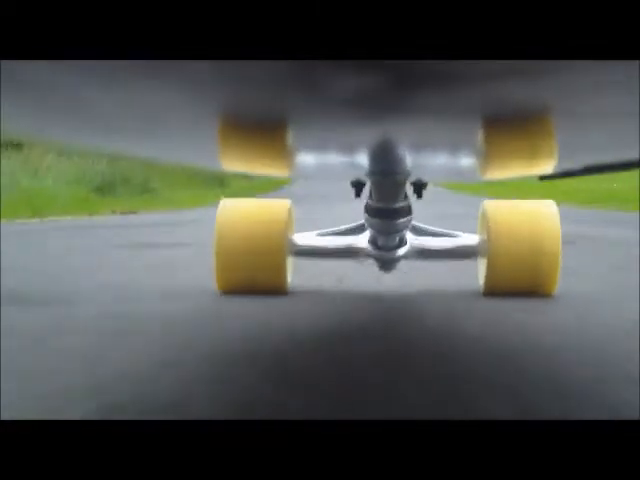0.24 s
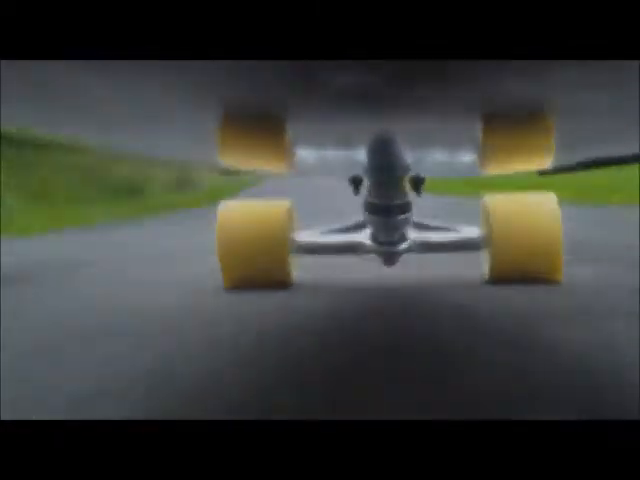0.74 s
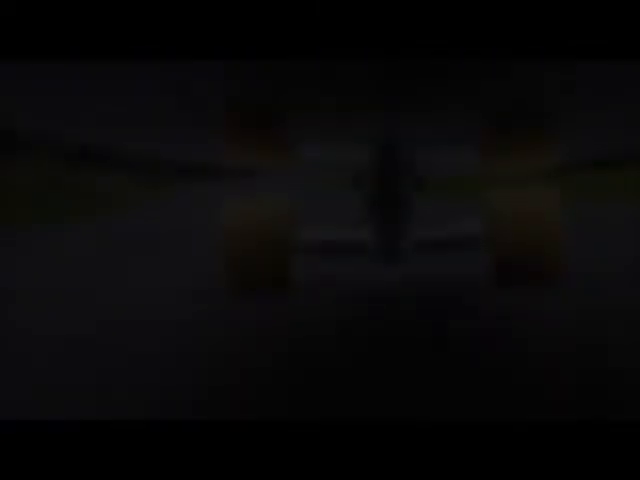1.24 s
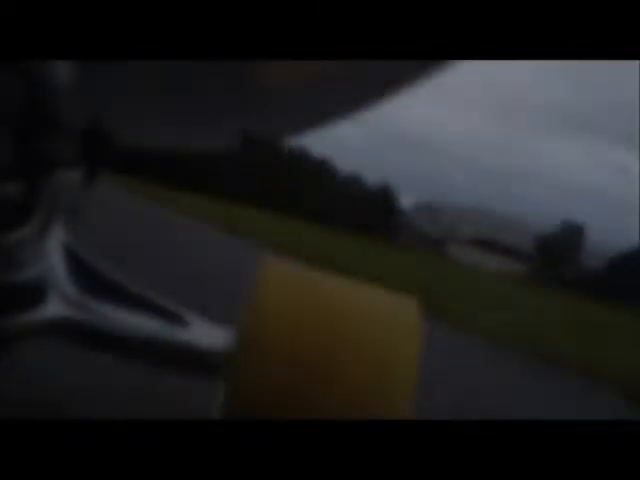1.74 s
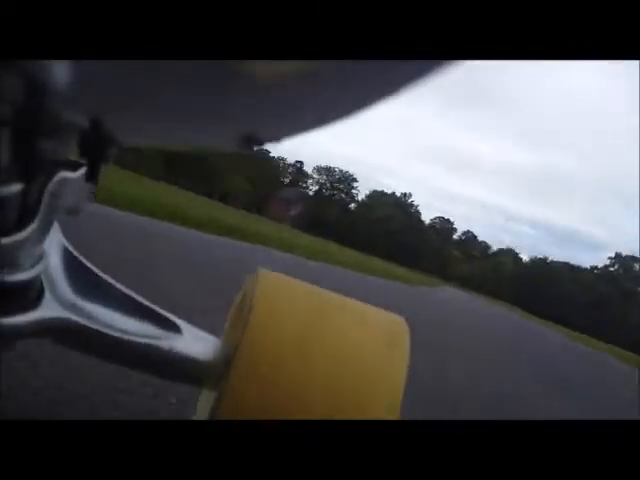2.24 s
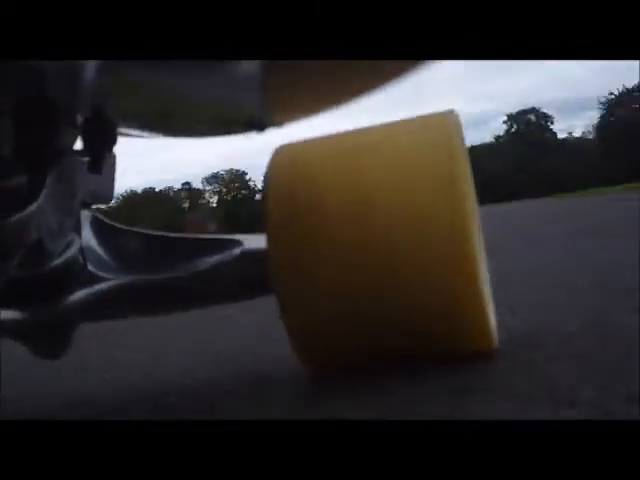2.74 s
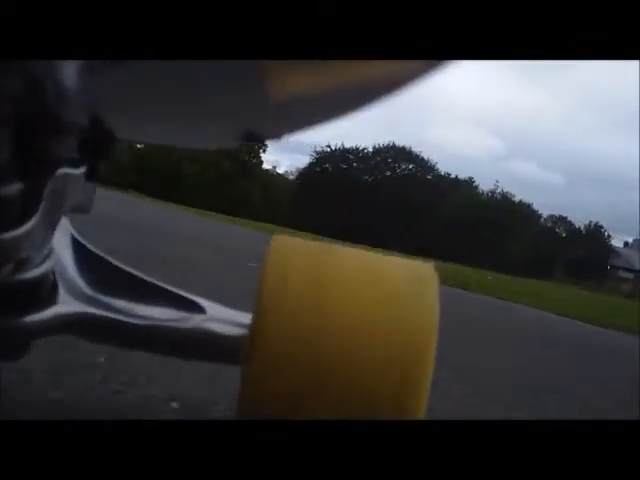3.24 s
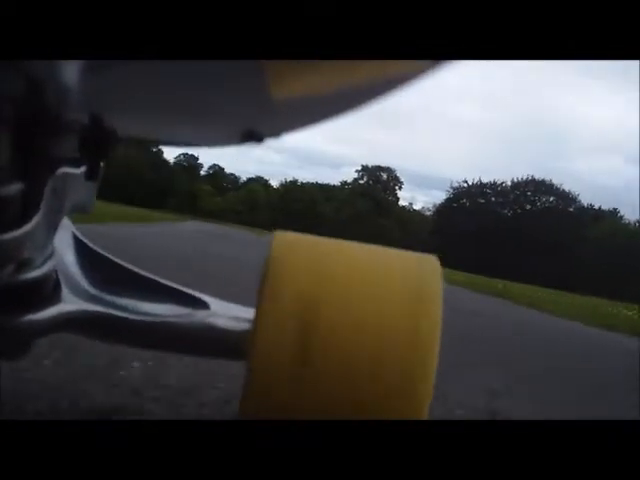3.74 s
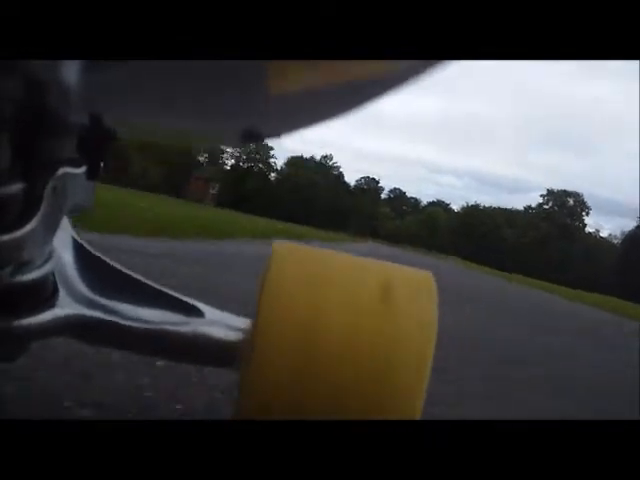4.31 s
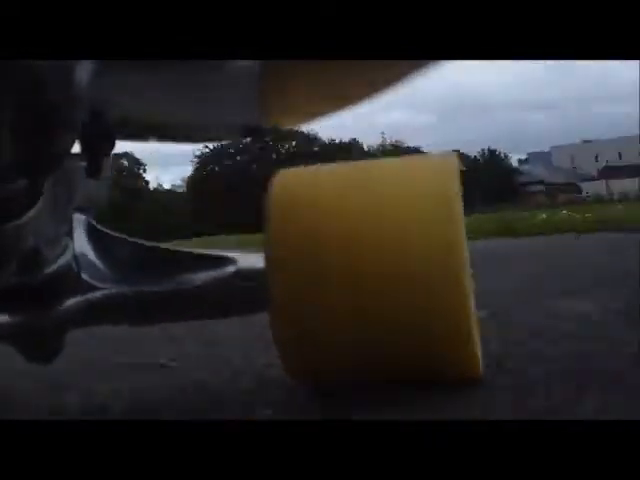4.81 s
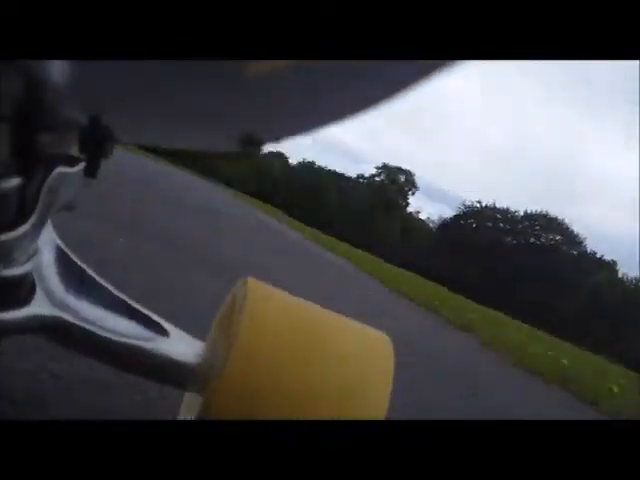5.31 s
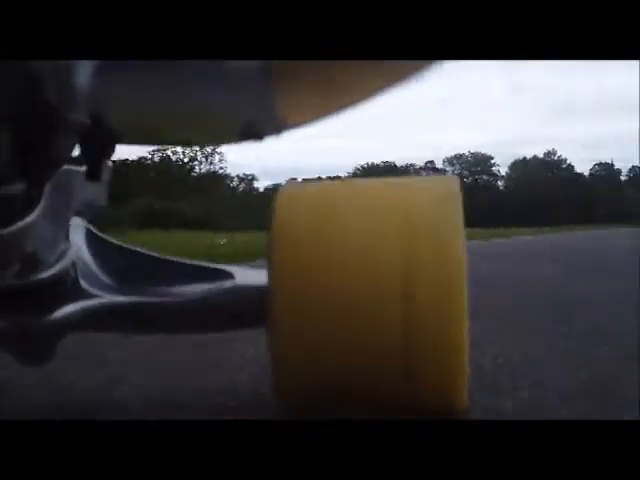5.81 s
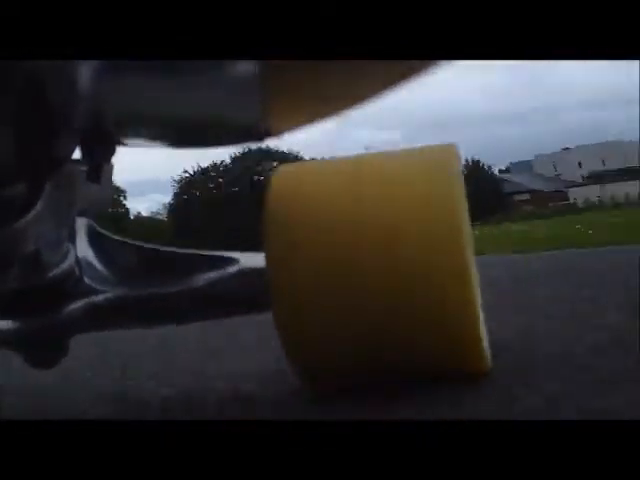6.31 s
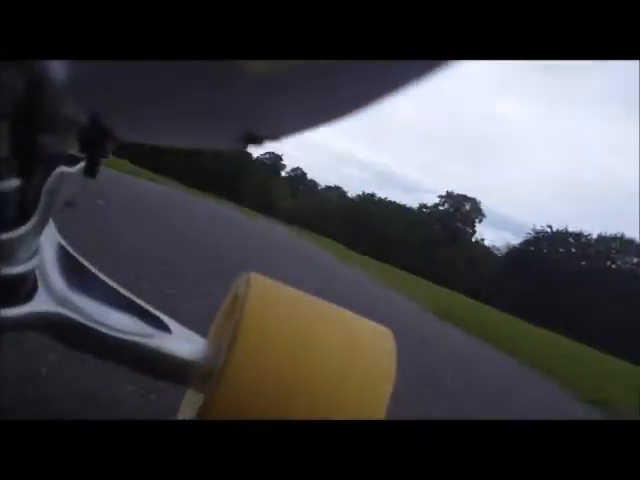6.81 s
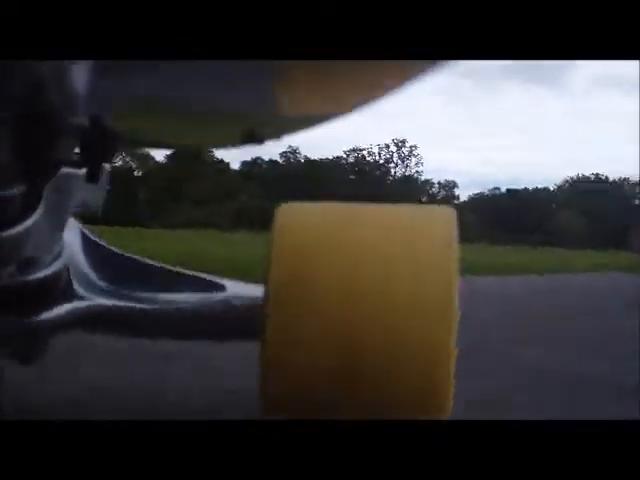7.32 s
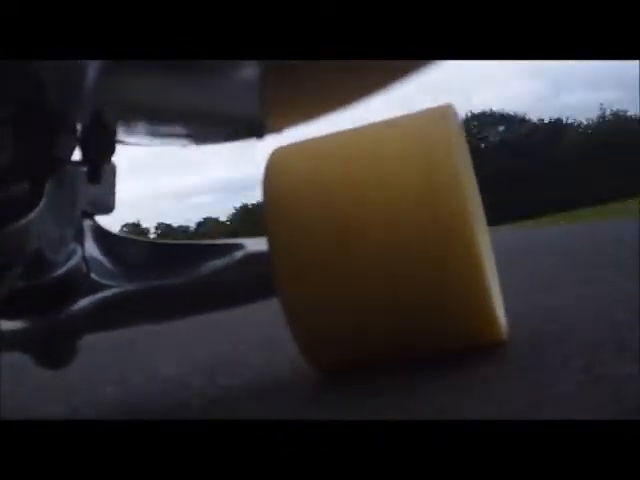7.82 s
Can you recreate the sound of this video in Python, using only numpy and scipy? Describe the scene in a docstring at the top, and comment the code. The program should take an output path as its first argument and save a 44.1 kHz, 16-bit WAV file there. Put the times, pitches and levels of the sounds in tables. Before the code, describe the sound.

Close under a longboard outdoors, soft wheels roar over asphalt while the deck drums and grit hisses. Bumps knock and stone chips tick on metal. Around two seconds the sound shifts abruptly to beside one wheel: quieter, with a faint rising whirr, swelling tread scrubs, brief rasping skids, and wind thumping the microphone until the end.

```python
"""The soft wheels of a longboard roar over asphalt: random contacts with the stones of the road ring their resonances.
One listens under the deck, first between the wheels, then beside one of them. The same road drums the deck.
The tread scrubs and rasps, at times harder in a carve or a slight turn; fine grit hisses and crunches, a bearing sings.
Bumps knock and ring the deck, a slipping wheel edge rasps, and flung chips tick against the metal truck.
Behind this, filtered noise makes the wind that thumps and hisses at the microphone."""
import sys
import numpy as np
from scipy import signal
from scipy.fft import rfft, irfft
from scipy.io import wavfile
from scipy.ndimage import uniform_filter1d

SR = 44100
rng = np.random.default_rng(int(sys.argv[2]) if len(sys.argv) > 2 else 0)


def generate_wav(sig):
    """Save sig (samples, or channels by samples) to the path in sys.argv[1] as 16-bit PCM at SR."""
    pcm = np.round(np.clip(np.atleast_2d(sig).T, -1, 1) * 32767).astype(np.int16)
    wavfile.write(sys.argv[1], SR, pcm)


N = 355446

# the deck bending along its length, and below that twisting:
# (f/Hz, width/Hz, relative level between the wheels/dB, relative level beside one/dB)
FLEX_MODES = [(112.3, 43, -9, -5.5), (139.2, 34, 1, 2), (163.6, 9.6, -3.5, 0.5)]
TWIST_MODES = [(188, 39.7, 2.5, -0.5), (246.4, 55, 4.5, 0), (291, 101, 1, -3.5)]
# listening position: (t/s, share between the wheels: 1 between, 0 beside one)
POSITION = [(2.16, 1), (2.2, 0)]
# the ride between the wheels, then beside one: (t/s, roar level before trim/dB, grit level before trim/dB)
RIDE_BETWEEN = [(0.0, -17, -34), (0.27, -14, -32), (0.42, -18.5, -34.5), (0.8, -15.5, -33.5),
                (1.32, -17, -31), (1.4, -19, -35), (1.65, -16.5, -33.5), (2.05, -14.5, -31),
                (2.17, -15.0, -29.5)]
RIDE_BESIDE = [(2.19, -20, -40), (2.27, -23.5, -43), (2.5, -25.5, -42.0), (2.76, -21.5, -38),
               (2.9, -24.5, -38.0), (3.05, -21.5, -36), (3.15, -21.5, -40.0), (3.6, -20, -41.0),
               (3.88, -23, -38.5), (4.05, -24.0, -43.5), (4.28, -26, -42.0), (4.38, -19, -37.5),
               (4.52, -24.5, -41.5), (4.97, -28.5, -44.5), (5.2, -20, -41.5), (5.52, -20.5, -40),
               (5.7, -26, -43.5), (6.0, -23, -38.0), (6.35, -23, -37), (6.55, -21, -40), (6.87, -18, -34.5),
               (7.11, -20.5, -40.5), (7.15, -28, -48), (7.45, -30.5, -43.5), (7.68, -22, -34.5),
               (7.85, -22, -36.5), (8.06, -25.5, -38.5)]


def from_db(db):
    """Turn decibels into a gain."""
    return 10 ** (np.asarray(db) / 20)


def rms_one(x):
    """Scale a sound to an average (rms) level of 1."""
    return x / np.sqrt(np.mean(x ** 2) + 1e-20)


def steady(x, seconds=0.11):
    """Hold the running level at 1, so that only the quick grain remains."""
    running_power = uniform_filter1d(x * x, int(seconds * SR))
    return x / np.sqrt(running_power + 1e-12)


def in_time(rows):
    """Draw straight lines between the rows: one value per sample for each column after the time."""
    times, *columns = np.transpose(rows)
    return [np.interp(np.arange(N) / SR, times, column) for column in columns]


def drift(rate_hz):
    """A random wander around 0 with spread 1, mostly slower than the given rate."""
    step = 40  # samples between computed points
    r = np.exp(-2 * np.pi * rate_hz * step / SR)
    warm_up = 2000  # points dropped while the filter settles
    noise = rng.standard_normal(N // step + 2 + warm_up)
    slow = signal.lfilter([1], [1, -2 * r, r * r], noise)[warm_up:]
    return np.interp(np.arange(N) / step, np.arange(len(slow)), rms_one(slow))


def cut(x, hz, kind, order=2):
    """Butterworth filter: "high" keeps what lies above the pitch hz, "low" what lies below."""
    return signal.sosfilt(signal.butter(order, hz, kind, fs=SR, output="sos"), x)


def response(spectrum, size=4096):
    """The click that has this spectrum, with its energy as early as possible (minimum phase); peak 1."""
    hz, db = np.transpose(spectrum)
    log_pitch = np.log(np.fft.rfftfreq(size, 1 / SR) + 1)
    gain = from_db(np.interp(log_pitch, np.log(hz), db))
    # folding the cepstrum onto its first half gives minimum phase
    cepstrum = irfft(np.log(gain))
    cepstrum[1:size // 2] *= 2
    cepstrum[size // 2 + 1:] = 0
    pulse = irfft(np.exp(rfft(cepstrum)))
    return pulse / np.abs(pulse).max()


def colour(x, spectrum):
    """Give every click in x this spectrum."""
    return signal.oaconvolve(x, response(spectrum))[:N]


def resonate(x, modes, between=0):
    """Side-by-side resonances with alternating signs; the listening position sets how loud each is."""
    out = 0
    for k, (hz, width, between_db, beside_db) in enumerate(modes):
        r = np.exp(-np.pi * width / SR)
        poles = [1, -2 * r * np.cos(2 * np.pi * hz / SR), r * r]
        ring = (1 - r * r) / 2 * signal.lfilter([1, 0, -1], poles, x + 1e-18)
        gain = between * from_db(between_db) + (1 - between) * from_db(beside_db)
        out = out + (-1) ** k * gain * ring
    return out


def contacts(per_s, spread_db):
    """Clicks at random moments with random sizes and signs, as from stones or grains; rms 1."""
    sizes = from_db(spread_db * np.minimum(rng.exponential(1, N), 4))
    signs = rng.choice([-1, 1], N)
    return rms_one(sizes * signs * (rng.random(N) < per_s / SR))


def strikes(events):
    """One click for each row (t/s, strength/dB)."""
    out = np.zeros(N)
    for s, db in events:
        out[int(np.clip(s * SR, 0, N - 1))] += from_db(db)
    return out


def bursts(events, decay_s):
    """An envelope that jumps at each event and dies away."""
    return signal.lfilter([1], [1, -np.exp(-1 / (decay_s * SR))], strikes(events) + 1e-18)


def swells(events):
    """One smooth arch for each row (middle t/s, length/s, level/dB, ..); one gain curve per level column."""
    t = np.arange(N) / SR
    total = 0
    for middle, length, *db in events:
        arch = np.cos(np.pi * np.clip((t - middle) / length, -.5, .5))
        total = total + np.outer(from_db(db), arch)
    return total


def follow(law):
    """The gain of a layer that follows the roar and the grit of the ride."""
    between_db, beside_db, per_roar, per_grit = law
    roar_db, grit_db = in_time(RIDE_BETWEEN + RIDE_BESIDE)
    between, = in_time(POSITION)
    swing_db = per_roar * (roar_db - roar_db.mean()) + per_grit * (grit_db - grit_db.mean())
    return from_db(between * between_db + (1 - between) * beside_db + swing_db)


def wheels(road, between):
    """Stones ring the wheels into a roar that thins with speed; beside a wheel a rising whirr joins in."""
    # resonances of the wheels and truck:
    # (f/Hz, width/Hz, relative level between the wheels/dB, relative level beside one/dB)
    wheel_modes = [(395, 50, -4, -3.5), (441, 62, 1, -1), (529.6, 135, -5, -3.5), (734, 130, -8.5, -3),
                   (828, 384, -15.5, -9.5)]
    thinning, thinning_hz = 0.86, 750  # share of the low end lost by the end, before levelling; its upper edge
    whirr_start_hz, whirr_climb_hz_per_s = 491.6, 20.6  # the whirr climbs as the board gathers speed
    t = np.arange(N) / SR
    roar = resonate(road * contacts(per_s=2500, spread_db=0.5), wheel_modes, between)
    roar = roar - thinning * (t / t[-1]) ** 2 * cut(roar, thinning_hz, "low", order=1)
    roar = steady(cut(cut(roar, 333, "high"), 770, "low", order=3))
    turn = 2 * np.pi * np.cumsum(whirr_start_hz + whirr_climb_hz_per_s * t) / SR
    # two random drifts blur the tone into a narrow band
    whirr = rms_one(road * (drift(45) * np.cos(turn) + drift(45) * np.sin(turn)))
    return steady(roar + from_db(-9.5) * (1 - between) * whirr, seconds=0.071)


def deck(road, between):
    """The stones drum the board, which flexes along its length and twists from wheel to wheel."""
    # how each layer follows the ride: (level between the wheels at average roar and grit/dB,
    # the same beside one/dB, change per roar [dB per dB], change per grit [dB per dB])
    flex_law = (-23.5, -22, 0.8, -0.13)
    twist_law = (-24, -19.5, 0.2, 0.69)
    # rippled asphalt shakes the deck harder: (middle t/s, length/s, flexing level/dB, twisting level/dB)
    ripples = [(0.08, .3, -17.5, -32), (0.78, 0.24, -15, -42), (0.93, 0.14, -33, -17),
               (1.04, 0.16, -11, -28), (1.28, 0.34, -14, -38), (1.89, .27, -15.5, -23),
               (2.8, .45, -26, -19), (3.27, 0.12, -20, -19), (3.44, 0.13, -16, -35),
               (3.72, 0.089, -16.5, -26), (3.89, 0.19, -23, -20), (4.42, .2, -17, -38),
               (6.2, .4, -23, -20.5)]
    flex = resonate(road * contacts(per_s=2000, spread_db=1.5), FLEX_MODES, between)
    flex = steady(cut(cut(flex, 66, "high"), 236, "low"), seconds=0.19)
    twist = resonate(road * contacts(per_s=1500, spread_db=2.5), TWIST_MODES, between)
    twist = steady(cut(cut(twist, 157, "high"), 415, "low", order=3))
    ripple_flex, ripple_twist = swells(ripples)
    # hypot adds the power of the steady ride and of the ripples
    flex_gain = np.hypot(follow(flex_law), ripple_flex)
    twist_gain = np.hypot(follow(twist_law), ripple_twist)
    return flex_gain * flex + twist_gain * twist


def scrub(road, between):
    """The tread slips in tiny jerks, with sharper, sparser rasping among them; both swell at times."""
    # resonances of the tread:
    # (f/Hz, width/Hz, relative level between the wheels/dB, relative level beside one/dB)
    tread_modes = [(841, 300, -2, 3.5), (1158, 281, 0, 3.5), (1366, 270, -2, -0.5), (1764, 250, -34, -16.5),
                   (2010, 370, -14.5, -21.5)]
    # spectrum of the rasping: (f/Hz, relative level/dB)
    rasp_spectrum = [(900, -38), (1400, 10.5), (1900, 10.5), (2400, 0), (2900, -3), (3600, -3.5),
                     (7000, -39)]
    # how each layer follows the ride: (level between the wheels at average roar and grit/dB,
    # the same beside one/dB, change per roar [dB per dB], change per grit [dB per dB])
    scrub_law = (-36, -30.5, 0.22, 1.07)
    rasp_law = (-47, -66.5, -2.5, 1.4)
    # harder scrubbing and rasping of the tread, in a carve or a slight turn:
    # (middle t/s, length/s, rasp level/dB, scrub level/dB)
    harder_scrubs = [(1.09, .3, -46, -27.5), (2.77, .18, -38, -32), (3.08, 0.53, -39.5, -45),
                     (3.3, 0.71, -77, -30), (4.8, 0.64, -45, -35), (5.36, 0.57, -37, -26.5),
                     (6.27, 0.75, -41, -43), (6.85, 0.11, -39, -24.5), (6.96, .14, -39, -26),
                     (7.7, 0.49, -41, -31.5)]
    slips = resonate(road * contacts(per_s=1800, spread_db=-1.5), tread_modes, between)
    soft = steady(cut(cut(slips, 790, "high"), 2620, "low"), seconds=0.077)
    sharp = steady(colour(road * contacts(per_s=500, spread_db=4.5), rasp_spectrum), seconds=0.07)
    harder_rasp, harder_scrub = swells(harder_scrubs)
    soft_gain = np.hypot(follow(scrub_law), harder_scrub)
    sharp_gain = np.hypot(follow(rasp_law), harder_rasp)
    return soft_gain * soft + sharp_gain * sharp


def grit(road):
    """Fine sand crackles under the wheels, over the hiss of air squeezed from the road's pores."""
    # spectrum of the grit: (f/Hz, relative level/dB)
    grit_spectrum = [(900, -26.5), (1600, 0), (2100, -2.5), (2750, -1.5), (3400, 0), (4000, -1.5),
                     (4500, -4.5), (5200, -6), (5800, -2), (6600, -2.5), (8000, -4), (9400, -6),
                     (12300, -19.5), (15300, -25)]
    crackle = road * contacts(per_s=5000, spread_db=3.0)
    fine = steady(colour(crackle + rng.standard_normal(N), grit_spectrum))
    # now and then a coarser grain pops: a burst of noise that dies away in 7.8 ms
    caught = np.abs(contacts(per_s=24, spread_db=1.5))
    pops = signal.lfilter([1], [1, -np.exp(-1 / (0.0078 * SR))], caught + 1e-18)
    coarse = rms_one(colour(pops * rng.standard_normal(N), grit_spectrum))
    return fine + from_db(-10) * coarse


def bearing():
    """The balls race: noise through one narrow, high resonance, with a random flutter in level."""
    race = resonate(rng.standard_normal(N), [(5770, 320, 0, 0)])
    race = rms_one(cut(race, 4500, "high"))
    return race * from_db(2 * drift(14))


def bumps():
    """A soft wheel drops over an edge: one rounded push, and the deck rings."""
    # bumps under a wheel: (t/s, strength before filtering/dB)
    bump_events = [(0.378, -7), (0.444, -7), (0.597, -3), (0.699, -10), (0.804, -8), (0.999, -5),
                   (1.124, -1), (1.305, -5.5), (2.003, -2), (2.145, -2), (2.22, -6), (2.609, -9),
                   (2.753, -4), (3.058, -6.5), (3.861, -7.5), (4.644, -7), (6.251, -8), (6.702, -9),
                   (6.872, -5), (7.031, -4), (7.174, -12), (7.504, -12.5), (7.619, -7), (7.68, -2),
                   (7.719, -1), (7.836, -8)]
    # spectrum of the push: (f/Hz, relative level/dB)
    push_spectrum = [(40, -69), (150, 10), (400, 10.0), (700, 8.0), (1300, -26.0), (2500, -62), (6000, -87)]
    hits = strikes(bump_events)
    push = colour(hits, push_spectrum)
    ring = cut(resonate(hits, FLEX_MODES + TWIST_MODES), 600, "low")
    return ring - from_db(1.0) * push


def skids():
    """The edge of a wheel lets go for an instant and rasps: dense random clicks in a short swell."""
    # short skids of the tread: (t/s, strength before smoothing/dB)
    skid_events = [(2.7536, -35), (3.1672, -21.5), (3.9948, -25), (4.5287, -23.5), (4.6454, -30),
                   (4.8145, -28), (4.915, -20.5), (5.1392, -17.5), (5.3044, -19.5), (5.3228, -20),
                   (5.3597, -16), (5.4144, -18), (5.5344, -18), (6.4834, -21), (6.6744, -24), (7.5622, -25)]
    # spectrum of a skid: (f/Hz, relative level/dB)
    skid_spectrum = [(300, -35), (700, 15), (1200, 12), (1800, 5), (2500, -9.5), (3500, -9.5),
                     (6000, -37.5)]
    rasp = steady(colour(contacts(per_s=1800, spread_db=4.5), skid_spectrum), seconds=0.009)
    swell = cut(bursts(skid_events, decay_s=0.016), 150, "low", order=1)  # the grip takes a moment to fail
    return from_db(-1.0) * rasp * swell


def crunches(grit_db):
    """A grain breaks with one crack amid a burst of smaller ones; small loose grains only crack."""
    # grit crushed under a wheel: (middle t/s, length/s, strength before trim/dB)
    crunch_events = [(0.304, .018, -33), (0.808, .02, -24), (0.932, .012, -26), (1.09, .014, -27),
                     (1.142, .02, -24), (1.316, 0.07, -26.5), (2.775, .01, -31), (2.822, .008, -33),
                     (2.942, .035, -30), (2.995, .01, -28.5), (3.06, .014, -29), (4.723, .008, -28),
                     (4.859, .012, -32.5), (5.886, .008, -26.5), (6.159, .016, -28), (6.27, .016, -30),
                     (6.389, .012, -28), (6.418, .012, -27), (6.558, .01, -27.5), (6.703, 0.015, -22.5),
                     (7.297, .008, -32.5), (7.835, .02, -25.5)]
    # spectrum of a crack: (f/Hz, relative level/dB)
    crunch_spectrum = [(500, -12), (1300, 21.5), (2100, 16.5), (3200, 20), (4500, 14.5), (7000, 15),
                       (10000, -40), (15000, -34)]
    crack_db = 10  # added to the table's strength for the main crack
    loose_per_s, loose_db = 14, 12  # small loose grains; their largest click above the grit curve, in dB
    loose = (rng.random(N) < loose_per_s / SR) * (2 * rng.random(N) - 1) * from_db(grit_db + loose_db)
    main_cracks = strikes([(s, db + crack_db) for s, _, db in crunch_events])
    cracks = colour(main_cracks + loose, crunch_spectrum)
    splinters = steady(colour(contacts(per_s=5000, spread_db=2.5), crunch_spectrum), seconds=.01)
    crushing, = swells(crunch_events)
    return cracks + from_db(-4) * splinters * crushing


def chips():
    """A chip flung against the metal truck gives a tiny bright tick and a very short rattle of noise."""
    # chips that hit the truck: (t/s, strength before trim/dB)
    chip_events = [(0.081, -20), (0.1371, -22), (0.6804, -22), (1.0083, -13.5), (1.309, -19), (1.331, -18),
                   (2.6467, -22), (2.6773, -15)]
    # spectrum of a tick: (f/Hz, relative level/dB)
    chip_spectrum = [(2500, -21), (5500, -1), (7500, 2), (10000, 1.5), (13000, -8), (16000, -7)]
    tick = colour(strikes(chip_events), chip_spectrum)
    rattle = rms_one(colour(rng.standard_normal(N), chip_spectrum)) * bursts(chip_events, decay_s=0.0014)
    return from_db(2) * tick + from_db(-4) * rattle


def wind(road):
    """Eddies thump on the microphone port and air hisses past it: low and high noise, harder in a gust."""
    # spectra of the thumping, then of the hiss: (f/Hz, relative level/dB)
    gust_spectrum = [(15, -58), (28, -2), (45, 10), (70, 14), (95, 19.5), (150, 11.5), (400, -58.5)]
    air_spectrum = [(3000, -14), (7000, -25), (10000, 8.5), (15500, 9)]
    # how each layer follows the ride: (level between the wheels at average roar and grit/dB,
    # the same beside one/dB, change per roar [dB per dB], change per grit [dB per dB])
    buffet_law = (-41, -31.5, .6, 0.6)
    air_law = (-56, -47.5, 0, 1.45)
    # gusts: (middle t/s, length/s, thumping level/dB, hiss level/dB)
    gusts = [(2.08, 0.53, -24.5, -43), (2.82, .32, -27, -57), (4.05, .6, -25, -75),
             (4.69, 0.32, -23.5, -58), (5.5, 1.5, -30, -60), (7.1, 0.36, -28, -59),
             (7.85, 0.34, -28.5, -39)]
    lumps = from_db(2 * drift(12))
    eddies = steady(colour(rng.standard_normal(N), gust_spectrum) * lumps)
    air = steady(colour(road * rng.standard_normal(N), air_spectrum))
    gust_buffet, gust_air = swells(gusts)
    buffet_gain = np.hypot(follow(buffet_law), gust_buffet)
    air_gain = np.hypot(follow(air_law), gust_air)
    return buffet_gain * eddies + air_gain * air


def scene():
    """Mix all layers; one shared unevenness of the road shapes those that roll on it and the air hiss."""
    # the rider's weight loads the bearing and it sings: (middle t/s, length/s, level before flutter/dB)
    loads = [(3.55, 2.8, -49), (4.38, 0.17, -45), (5.22, .35, -48), (6.76, 0.35, -55)]
    roar_db, grit_db = in_time(RIDE_BETWEEN + RIDE_BESIDE)
    between, = in_time(POSITION)
    load, = swells(loads)
    road = from_db(0.95 * drift(27) + 1.28 * drift(100))
    rumble = from_db(roar_db - 0.13) * wheels(road, between) + deck(road, between)
    hiss = from_db(grit_db + 0.52) * grit(road) + load * bearing()
    debris = bumps() + skids() + crunches(grit_db) + chips()
    mix = rumble + scrub(road, between) + hiss + debris + wind(road)
    return mix[None]


def record(dry):
    """The microphone port swallows one high band, the loudest peaks are rounded, the top is cut."""
    notch_hz, notch_q, cutoff_hz = 11270, 4, 15300
    heard = signal.lfilter(*signal.iirnotch(notch_hz, notch_q, fs=SR), dry)
    heard = heard / (1 + heard ** 8) ** (1 / 8)
    return signal.sosfilt(signal.ellip(10, .2, 70, cutoff_hz, fs=SR, output="sos"), heard)


dry = scene()
out = record(dry)
generate_wav(out)
```